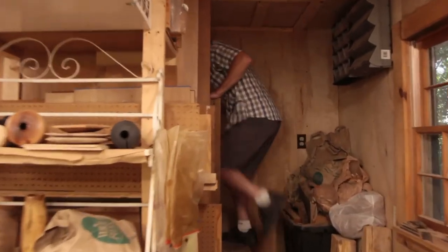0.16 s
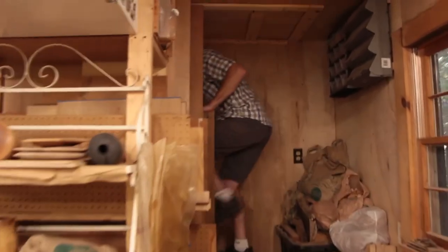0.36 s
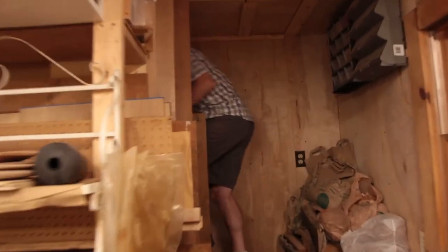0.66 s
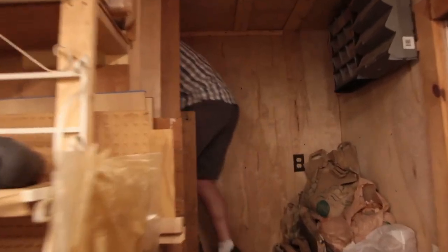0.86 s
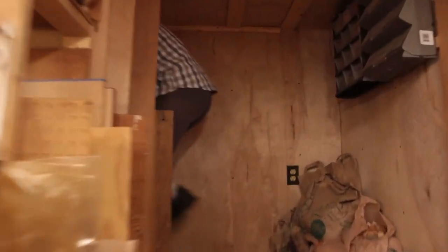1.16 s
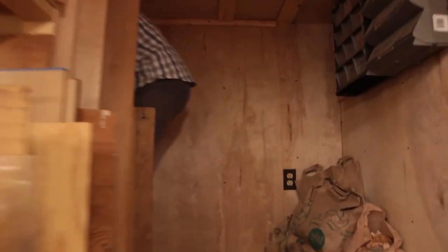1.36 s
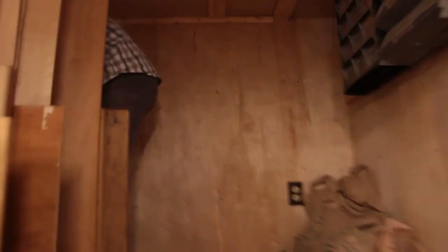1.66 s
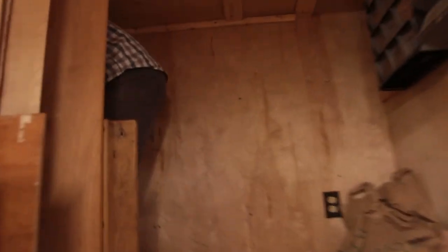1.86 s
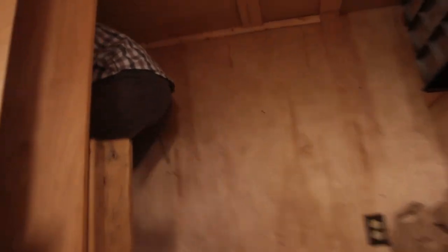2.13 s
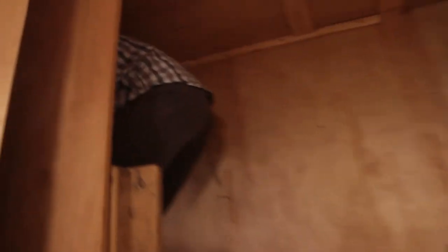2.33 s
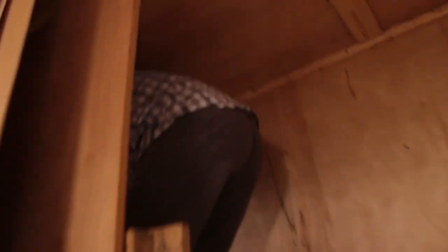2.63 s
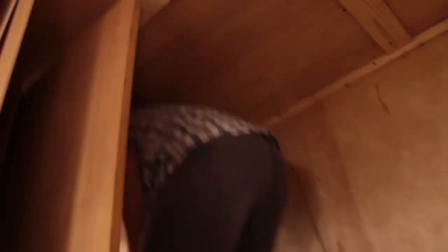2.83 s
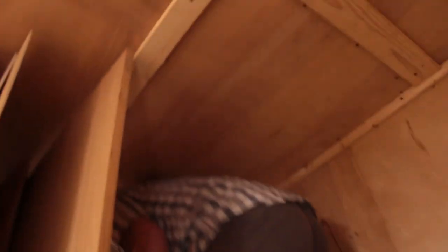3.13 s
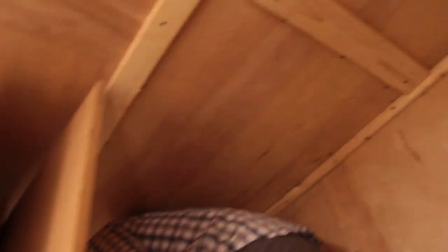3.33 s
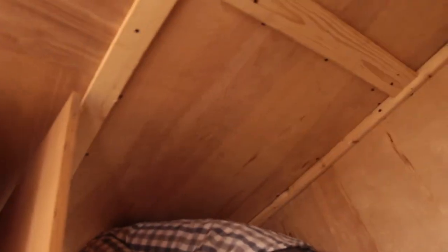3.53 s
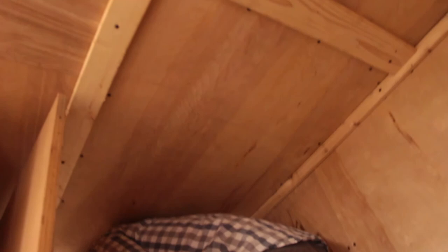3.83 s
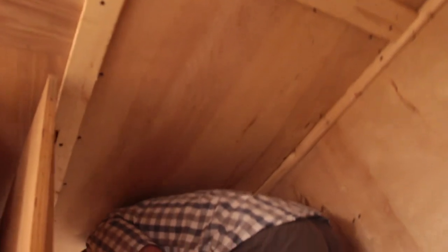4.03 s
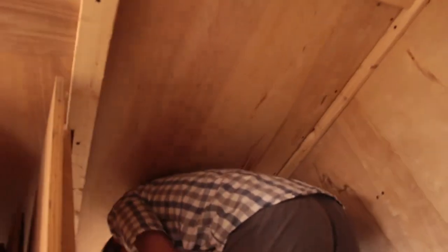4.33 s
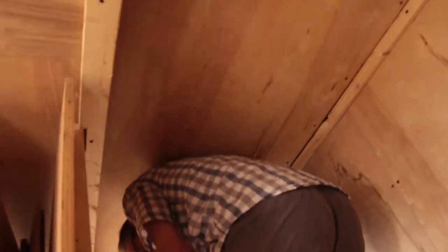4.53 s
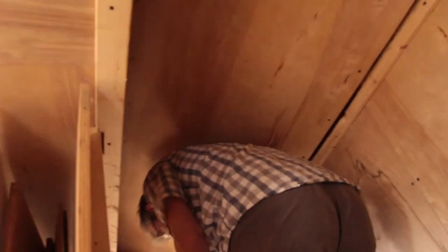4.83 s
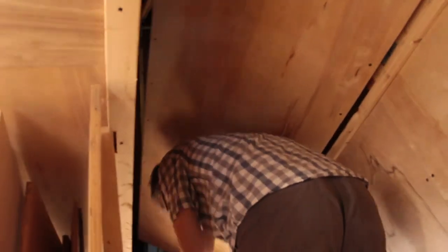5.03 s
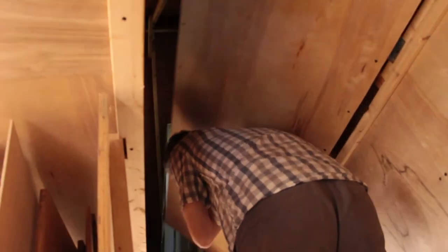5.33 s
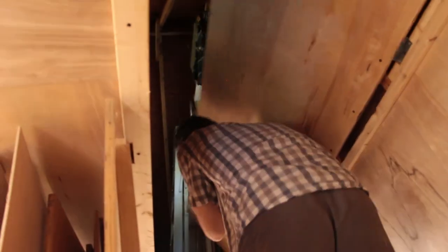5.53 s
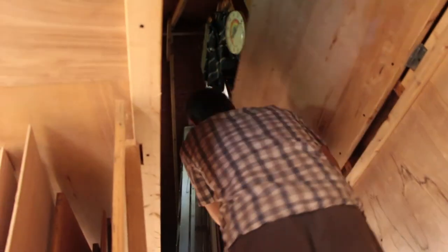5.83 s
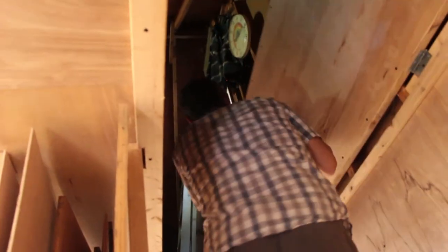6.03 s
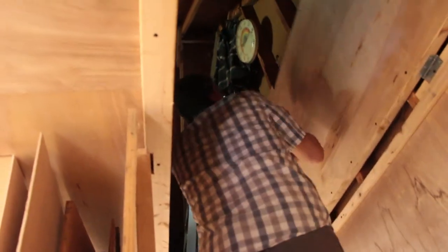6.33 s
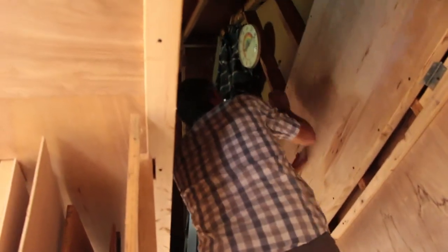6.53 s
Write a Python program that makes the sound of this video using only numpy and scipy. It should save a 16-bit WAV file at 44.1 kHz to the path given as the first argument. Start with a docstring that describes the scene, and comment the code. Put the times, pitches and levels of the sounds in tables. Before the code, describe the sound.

Feet thud up wooden stairs over a low motor hum, then an overhead hatch creaks, scrapes and knocks into place.

```python
"""A motor hums throughout in a small workshop, and clothes rustle faintly as someone climbs steep stairs.
Each footfall is an impact: it cracks on a wooden tread, rings the boards and sets the frame swaying.
After four seconds a plywood hatch overhead is pushed open, and its hinge creaks by stick-slip friction.
The hatch grinds, bumps and rubs along its frame; at last it knocks home and bounces once."""
import sys
import numpy as np
from scipy import signal
from scipy.fft import rfft, irfft
from scipy.io import wavfile
from scipy.ndimage import uniform_filter1d

SR = 44100
rng = np.random.default_rng(int(sys.argv[2]) if len(sys.argv) > 2 else 0)


def inscribe(sig):
    """Save sig as 16-bit PCM at rate SR to the path in sys.argv[1].

    A 1-D sig is mono; a 2-D sig holds one channel per row.
    Samples are clipped to [-1, 1] before scaling.
    """
    pcm = np.round(np.clip(np.atleast_2d(sig).T, -1, 1) * 32767)
    wavfile.write(sys.argv[1], SR, pcm.astype(np.int16))


N = 294595
TIME = np.arange(N) / SR
AGE = TIME[:SR // 2]   # time since an impact
CUTOFF_HZ = 15900


def from_db(db):
    return 10 ** (np.asarray(db) / 20)


def rms_one(x):
    return x / np.sqrt(np.mean(x ** 2) + 1e-20)


def at_hz(points, hz):
    known_hz, values = np.transpose(points)
    return np.interp(np.log(hz), np.log(known_hz), values)


def band(x, low, high, order=3):
    sos = signal.butter(order, [low, min(high, .48 * SR)], "band", fs=SR, output="sos")
    return signal.sosfilt(sos, x + 1e-18)


def drift(per_s):
    """Random modulation: straight lines between values of unit spread."""
    return np.interp(TIME * per_s, np.arange(400), rng.standard_normal(400))


def stroke(s, rise_s, fall_s):
    """Sliding speed: a Gaussian bell that reaches 1 at time s."""
    return np.exp(-.5 * ((TIME - s) / np.where(TIME < s, rise_s, fall_s)) ** 2)


def coloured(x, spectrum):
    """Spectral shaping, with a roll-off below the first point; rms 1."""
    hz = np.maximum(np.fft.rfftfreq(N, 1 / SR), 1)
    roll_off = np.minimum(hz / spectrum[0][0], 1) ** 2
    return rms_one(irfft(rfft(x) * from_db(at_hz(spectrum, hz)) * roll_off, N))


def friction(spectrum):
    """Friction noise: fibres catch and let go, changing its strength every few milliseconds."""
    grip = rms_one(uniform_filter1d(rng.standard_normal(N), size=260))
    return coloured(rng.standard_normal(N) * from_db(1.4 * grip), spectrum)


# Spectra of moving air and of the room's rumble: frequency_hz, density_db
AIR_SPECTRUM = [(82, -51), (140, -13), (149, -14), (238, -4.5), (353, -10.5), (390, -10.5), (534, -13.5),
                (824, -17.5), (892, -18.5), (1490, -23.5), (1780, -21.5), (4850, -35.5), (15500, -47)]
RUMBLE_SPECTRUM = [(20, -4), (30, 9.5), (45, 0.5), (70, -2.5), (95, 1), (140, -10), (210, -12.5),
                   (300, -17), (450, -52)]


def room_noise(air_db=-52.5, rumble_db=-42):
    """Stationary broadband noise: moving air over a low rumble."""
    air = from_db(air_db) * coloured(rng.standard_normal(N), AIR_SPECTRUM)
    rumble = from_db(rumble_db) * coloured(rng.standard_normal(N), RUMBLE_SPECTRUM)
    return air + rumble


# Partials of the motor: pitch_hz, level_db
MOTOR_PARTIALS = [(59.2, -35), (91.5, -45.5), (118.4, -41), (177.6, -56), (236.9, -58), (538.3, -67.5),
                  (586.8, -68), (877.5, -68.5), (1820, -80), (2444, -75)]
# The hum grows as the listener nears the stairs: time_s, gain_db
MOTOR_GAIN = [(0, -2.5), (.8, -2.5), (1.1, -3.5), (1.6, -2.5), (2.2, -0.4), (6.68, -2)]


def motor_hum(waver_rad=0.045):
    """Periodic vibration gives a line spectrum; each partial wavers slightly in phase."""
    hum = 0
    for hz, db in MOTOR_PARTIALS:
        phase = 2 * np.pi * (hz * TIME + rng.random()) + waver_rad * drift(11)
        hum += np.sqrt(2) * from_db(db) * np.sin(phase)
    return from_db(np.interp(TIME, *np.transpose(MOTOR_GAIN))) * hum


# Swishes, about one to each move of a limb: peak_s, width_s, level_db, extra_treble_db
SWISHES = [(0.27, 0.11, -60.5, -0.5), (0.44, 0.067, -55, -6), (0.83, 0.062, -57.5, 5),
           (1.21, .11, -59.5, 2.5), (1.66, 0.067, -67, 8.5), (2.12, 0.25, -64, 1),
           (2.93, 0.051, -58.5, -2.5), (3.92, 0.13, -66, -1.5), (4.44, 0.17, -54, -2),
           (5.95, 0.038, -63, 4.5), (6.6, 0.12, -55.5, 2.5)]
# Spectrum of rubbing cloth: frequency_hz, density_db
CLOTH_SPECTRUM = [(710, -20), (1200, -0.5), (1320, -4.5), (1490, -4), (2010, -8), (2380, -6.5), (4830, -14),
                  (6240, -13), (15500, -23.5)]


def clothes(gain_db=1, treble_hz=4000):
    """Sliding friction of cloth on cloth: noise swells with each move, some brighter than others."""
    grain = friction(CLOTH_SPECTRUM)
    low, high = band(grain, 300, treble_hz), band(grain, treble_hz, CUTOFF_HZ)
    return sum(from_db(gain_db + db) * stroke(s, width, width) * (low + from_db(treble_db) * high)
               for s, width, db, treble_db in SWISHES)


# Sound scattered by walls and shelves: frequency_hz, density_db
SCATTER_SPECTRUM = [(100, 13), (300, 1.5), (700, 8), (1400, -1.5), (2500, -7), (3800, -7), (4900, -21),
                    (6500, -8), (9000, -25), (15000, -22.5)]
# Reverberation time of the workshop: frequency_hz, t60_s
ROOM_DECAY = [(100, 0.61), (400, 0.3), (1000, 0.28), (3000, 0.27), (6000, 0.33), (15000, 0.63)]


def reflections(early_t60, late_db):
    """Diffuse reverberation: a quick burst from near surfaces, then a tail that decays band by band."""
    edges = np.geomspace(90, 16000, 19)
    white = rng.standard_normal((2, len(AGE)))
    out = 0
    for k, (low, high) in enumerate(zip(edges, edges[1:])):
        hz = np.sqrt(low * high)
        fade = from_db(-60 * AGE / early_t60) + from_db(late_db - 60 * AGE / at_hz(ROOM_DECAY, hz))
        out += band(white[k % 2], low, high, order=2) * fade * from_db(at_hz(SCATTER_SPECTRUM, hz))
    return rms_one(out)


def in_registers(sound, edges, levels_db):
    """Filter bank: each band is scaled so that its first 30 ms have the given level."""
    parts = [band(sound, low, high) for low, high in zip(edges, edges[1:])]
    return sum(from_db(db) * part / np.std(part[:SR * 3 // 100]) for part, db in zip(parts, levels_db))


# Snaps of loaded joints: start_s, middle_db, treble_db
JOINT_SNAPS = [(0.857, -57, -64), (2.3854, -34.5, -43), (2.758, -54, -69), (2.8468, -48.5, -58.5),
               (4.0628, -51.5, -54.5), (4.0901, -54.5, -57.5), (4.208, -49, -52.5), (4.296, -66, -50),
               (5.181, -50, -40), (5.206, -45.5, -48), (6.1454, -45, -60), (6.496, -58, -42)]


def joint_snaps(gain_db=-1):
    """Impulsive release: a loaded joint gives a short, bright burst with no weight behind it."""
    out = np.zeros(N)
    for s, *levels_db in JOINT_SNAPS:
        burst = reflections(early_t60=0.063, late_db=-14.5)
        add(out, s, in_registers(burst, [1000, 4300, 15500], levels_db))
    return from_db(gain_db) * out


def add(out, s, sound):
    """Superposition: mix a sound in at time s."""
    i = round(s * SR)
    out[i:i + len(sound)] += sound[:N - i]


# Slides of the hatch along its frame: peak_s, rise_s, fall_s, rub_db, hiss_db
HATCH_SLIDES = [(5.08, 0.066, 0.051, -48, -46), (5.33, 0.049, 0.28, -48, -49.5),
                (5.785, 0.029, 0.028, -50, -65), (6.471, 0.039, 0.038, -39, -54.5)]
# Pushes that make the hatch grind: peak_s, rise_s, fall_s, level_db
HATCH_PUSHES = [(4.83, 0.063, 0.042, -43), (4.91, 0.011, 0.22, -40)]
# Spectra of rubbing and of grinding plywood: frequency_hz, density_db
RUB_SPECTRUM = [(290, -21), (500, 6), (638, 5), (792, 3.5), (876, -3.5), (1290, 4), (2690, -5),
                (3630, -11.5), (4910, -21.5), (6180, -20), (7780, -24.5), (15500, -28.5)]
GRIND_SPECTRUM = [(190, 4.5), (260, -2.5), (350, -9), (550, -25), (1000, -18.5), (3000, -41)]


def hatch_friction(rub_gain_db=-1, grind_gain_db=-1):
    """Friction noise grows with sliding speed: plywood grinds dully as it lifts and rubs on its frame."""
    grain = friction(RUB_SPECTRUM)
    rub = from_db(rub_gain_db) * rms_one(band(grain, 380, 2030))
    hiss = rms_one(band(grain, 3730, 15200))
    rubbing = sum(stroke(s, rise, fall) * (from_db(rub_db) * rub + from_db(hiss_db) * hiss)
                  for s, rise, fall, rub_db, hiss_db in HATCH_SLIDES)
    push = sum(from_db(db) * stroke(s, rise, fall) for s, rise, fall, db in HATCH_PUSHES)
    return rubbing + from_db(grind_gain_db) * push * friction(GRIND_SPECTRUM)


# Brief tones of the hinge: peak_s, width_s, pitch_hz, level_db
HINGE_TONES = [(4.41, 0.007, 1690, -47), (4.44, 0.037, 1075, -47), (4.51, 0.048, 660, -53.5),
               (4.47, .03, 1720, -57), (4.585, .018, 1420, -53), (4.56, 0.062, 3770, -63.5)]


def hinge_squeals(waver_rad_per_khz=0.8, flutter_db=4.5):
    """Mode locking: slips fall in step with one resonance, which sings with unsteady pitch and level."""
    out = 0
    for s, width, hz, db in HINGE_TONES:
        envelope = from_db(db + flutter_db * drift(58)) * stroke(s, width, width)
        phase = 2 * np.pi * hz * TIME + waver_rad_per_khz * hz / 1000 * drift(58)
        out += envelope * np.sqrt(2) * np.sin(phase)
    return out


# Envelopes of the turning hinge: time_s, groan_db, rasp_db
CREAK_LEVELS = [(4.295, -62, -64), (4.317, -38, -61), (4.333, -37, -50.5), (4.393, -49, -61),
                (4.405, -39, -52), (4.557, -53, -59), (4.583, -48, -54), (4.657, -82, -64),
                (4.67, -67, -70)]
# Resonances of the hinge: pitch_hz, bandwidth_hz, level_db
HINGE_MODES = [(385, 31, 2), (546, 51, -6), (660, 53, 3.5), (940, 150, -5), (1068, 50, 1), (1460, 25, -12),
               (1695, 38, -1), (2130, 190, -5.5), (3120, 270, -0.5), (3700, 120, 6), (4120, 120, 6.5),
               (5460, 240, -2), (6050, 350, -6)]


def hinge_creak(slips_per_s=280, uneven=0.5, groan_gain_db=-4, scrape_db=-27, room_db=-9):
    """Stick-slip: uneven impulses drive resonances; the shifting load favours now one, now another."""
    times, *curves_db = np.transpose(CREAK_LEVELS)
    spacing, strength = rng.standard_normal((400, 2)).T
    slip_s = times[0] + np.cumsum(np.exp(uneven * spacing)) / slips_per_s
    slips = np.zeros(N)
    slips[np.minimum(slip_s * SR, N - 1).astype(int)] = from_db(2 * strength)
    rings = from_db(scrape_db) * slips
    for hz, width, db in HINGE_MODES:
        radius = np.exp(-np.pi * width / SR)
        feedback = [1, -2 * radius * np.cos(2 * np.pi * hz / SR), radius ** 2]
        mode = signal.lfilter([1 - radius, 0, radius - 1], feedback, slips + 1e-18)
        rings += from_db(db + 2 * drift(18)) * mode
    room = reflections(early_t60=0.03, late_db=-9) / np.sqrt(len(AGE))   # unit energy
    rings += from_db(room_db) * signal.fftconvolve(rings, room)[:N]
    groan, rasp = (uniform_filter1d(from_db(np.interp(TIME, times, db, left=-120, right=-120)), size=400)
                   for db in curves_db)
    low, high = band(rings, 360, 2140), band(rings, 3000, 6500)
    turning = (TIME > times[0]) & (TIME < times[-1])
    groaning = from_db(groan_gain_db) * groan * low / np.std(low[turning])
    return groaning + rasp * high / np.std(high[turning])


# Modes of the wooden frame: pitch_ratio, level_db
FRAME_MODES = [(1.002, 6), (1.62, -13), (2.7, -14.5)]


def swing(hz, t60, glide, rise_s=0.0013, settle_s=0.0055):
    """Damped modes, the higher dying sooner; with glide, wood is stiff at contact and its pitch sinks."""
    cycles = hz * (AGE + glide * settle_s * (1 - np.exp(-AGE / settle_s)))
    modes = sum(from_db(db - 60 * AGE * np.sqrt(ratio) / t60) * np.sin(2 * np.pi * ratio * cycles)
                for ratio, db in FRAME_MODES)
    return modes * (1 - np.exp(-AGE / rise_s))


# The hatch is shoved, knocks home and bounces once: start_s, level_db
PANEL_KNOCKS = [(5.183, -14.5), (6.486, -4.5), (6.612, -13.5)]


def hatch_boom():
    """Panel resonance: each knock sounds the drum note of the plywood."""
    out = np.zeros(N)
    note = swing(hz=215.6, t60=0.1, glide=0, rise_s=0.0035)
    for s, db in PANEL_KNOCKS:
        add(out, s, from_db(db) * note)
    return out


# Weight coming onto the frame: start_s, level_db, pitch_hz, extra_pitch_ratio at contact, sway_db
FRAME_LOADS = [(0.561, -23, 60, 0, -16), (0.793, -27, 33.4, 3, -52), (1.52, -16.5, 85, 0, -18),
               (2.336, -16, 99, 0, -14.5), (2.867, -24.5, 93, 1, -40), (3.813, -25.5, 54.8, 0, -45),
               (4, -24.5, 74.7, .6, -43), (4.056, -20, 41.4, 1.5, -26.5), (4.284, -25.5, 36.5, 1, -30),
               (5.1835, -5.5, 63.5, 1.5, -17.5), (5.784, -22.5, 43.7, 3, -47), (6.492, -7, 70.6, 1.2, -14),
               (6.623, -18, 55.5, 1, -42)]


def frame_thuds(t60_cycles=12.9, sway_hz=30.05, sway_lag_s=0.0326):
    """Free vibration after a sudden load: the frame thumps, then the whole staircase sways."""
    out = np.zeros(N)
    sway = swing(sway_hz, t60_cycles / sway_hz, glide=1, rise_s=0.0037)
    for s, db, hz, glide, sway_db in FRAME_LOADS:
        add(out, s, from_db(db) * swing(hz, t60_cycles / hz, glide))
        add(out, s + sway_lag_s, from_db(sway_db) * sway)
    return out


# Bounds of wood's six registers (body, knock, clack, crack, snap, edge): frequency_hz
REGISTER_EDGES = [130, 300, 650, 1400, 2600, 4300, 15500]
# Modes of the staircase boards: pitch_hz, level_db, t60_s
BOARD_MODES = [(165, -3, .17), (218, 1, .18), (290, -8, .15), (388, -4, .15), (455, 0, .14), (544, -6, .14),
               (620, -5, .16), (700, -7, .16), (790, -5, .14), (860, -3, .13), (1015, -6, .12),
               (1205, -5, .12), (1390, -4, .12), (1530, -13, .11), (1660, -9, .12), (1950, -13, .11),
               (2300, -17, .11), (2470, -19, .12)]
# Heels, soles, hands and hatch striking wood:
# start_s, level_db, dull_above_hz, fall_db_per_octave, extra_snap_db, contact_s, board_hz
IMPACTS = [(0.551, -25.5, 1230, 9, 4.5, .0008, 904), (0.565, -31, 1150, 17, -4, 0.0036, 710),
           (0.764, -48, 450, 6.5, 2, 0.002, 610), (1.5166, -21.5, 1690, 14, 2.5, 0.0001, 414),
           (1.56, -31, 330, 14, 0, .004, 170), (2.333, -28.5, 1900, 13, 0.5, 0.0002, 365),
           (2.36, -31, 330, 15, 0, 0.0038, 170), (2.867, -39, 420, 8.5, 6, .0026, 215),
           (2.905, -40, 450, 7, 0, 0.016, 217), (4.797, -49, 445, 7, 1, 0.012, 222),
           (4.902, -42, 330, 11, 0, 0.0046, 206), (5.182, -30.5, 654, 7.5, 1, 0.002, 225),
           (5.916, -49.5, 900, 13, -3, .006, 930), (6.477, -30.5, 1100, 7, 0, .012, 456),
           (6.4846, -20, 1470, 19, -1, 0.008, 462), (6.612, -32, 1200, 15, -5, 0.0064, 560)]


def wood_impacts(ring_db=-4, click_db=-4, flex_t60=0.012, focus_db=6, focus_octaves=0.54, struck_db=4.5):
    """Impact excitation: a click, a flexing board, ringing neighbours, echoes; soft contact is slow."""
    out = np.zeros(N)
    hz, db, t60 = np.transpose(BOARD_MODES)[:, :, None]
    centres = np.sqrt(np.multiply(REGISTER_EDGES[:-1], REGISTER_EDGES[1:]))
    is_snap = np.arange(len(centres)) == 4
    hard_click = rms_one(band(np.exp(-AGE / 0.0003), 550, 3350, order=2))
    for s, level_db, dull_hz, fall_db, snap_db, contact_s, board_hz in IMPACTS:
        # modes and registers near the struck board's pitch are lifted
        near, struck = (np.exp(-.5 * (np.log2(f / board_hz) / focus_octaves) ** 2) for f in (hz, centres))
        strength = from_db(db + focus_db * near + rng.standard_normal(hz.shape))
        strength *= rng.choice([-1, 1], hz.shape)
        modes = strength * np.sin(2 * np.pi * hz * AGE) * from_db(-60 * AGE / t60)
        ring = from_db(ring_db) * rms_one(modes.sum(axis=0))
        onset = 1 - np.exp(-2 * AGE / contact_s)
        click = from_db(click_db) * hard_click * np.exp(-contact_s / 0.0048)
        flex = rms_one(onset * np.sin(2 * np.pi * board_hz * AGE) * from_db(-60 * AGE / flex_t60))
        sound = click + flex + onset * (ring + reflections(early_t60=0.073, late_db=-10.5))
        dull_db = 10 * np.log10(1 + from_db(fall_db * np.log2(centres / dull_hz)) ** 2)
        colour_db = struck_db * struck - dull_db + snap_db * is_snap
        add(out, s, in_registers(sound, REGISTER_EDGES, level_db + colour_db))
    return out


def scene():
    """Superposition of all sources in one channel, heard from the foot of the stairs."""
    wood = wood_impacts() + frame_thuds() + joint_snaps()
    hatch = hinge_creak() + hinge_squeals() + hatch_friction() + hatch_boom()
    return (wood + hatch + clothes() + motor_hum() + room_noise())[None]


def record(dry, threshold_db=-22, squeeze=0.39, release_db_per_s=25, attack_s=0.046, ceiling=0.8):
    """Compression ducks the room after loud blows; soft clipping and a low-pass filter follow."""
    level_db = 10 * np.log10(np.maximum(uniform_filter1d(dry[0] ** 2, size=220), 1e-12))
    cut_db = squeeze * np.maximum(level_db - threshold_db, 0)
    held_db = np.maximum.accumulate(cut_db + release_db_per_s * TIME) - release_db_per_s * TIME
    pole = np.exp(-1 / (attack_s * SR))
    ducked = dry * from_db(-signal.lfilter([1 - pole], [1, -pole], held_db))
    limited = ducked / (1 + (ducked / ceiling) ** 6) ** (1 / 6)
    return signal.sosfilt(signal.ellip(10, .1, 80, CUTOFF_HZ, fs=SR, output="sos"), limited)


dry = scene()
out = record(dry)
inscribe(out)
```